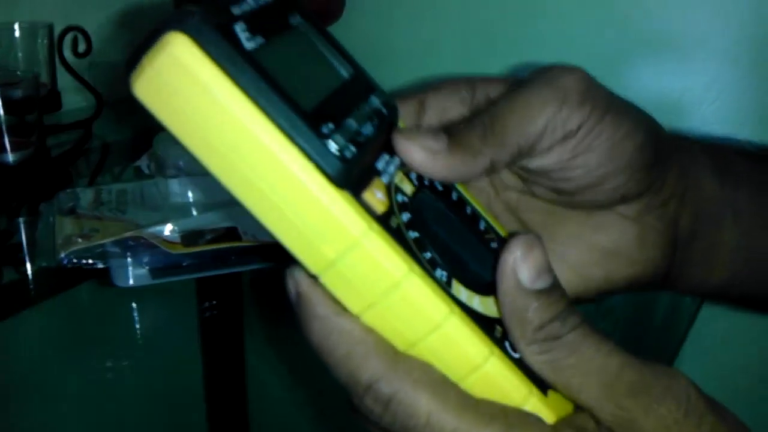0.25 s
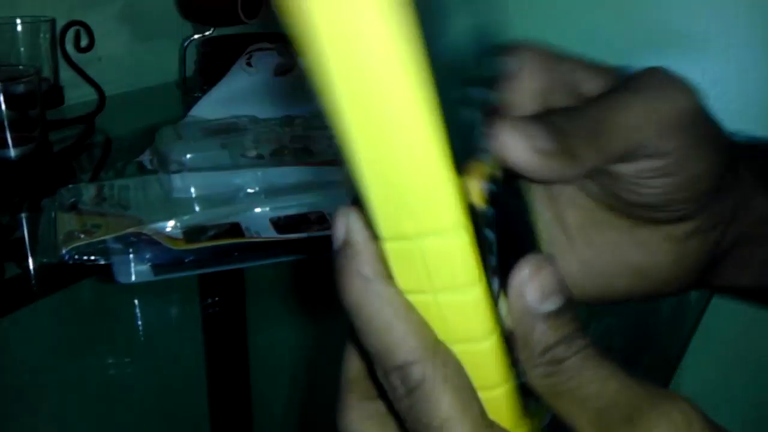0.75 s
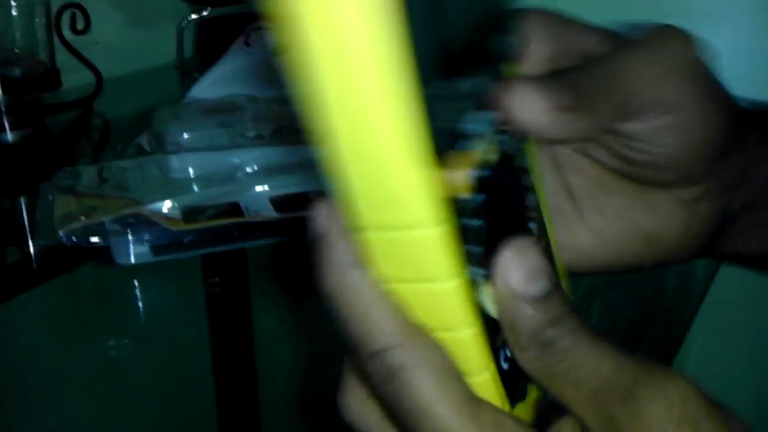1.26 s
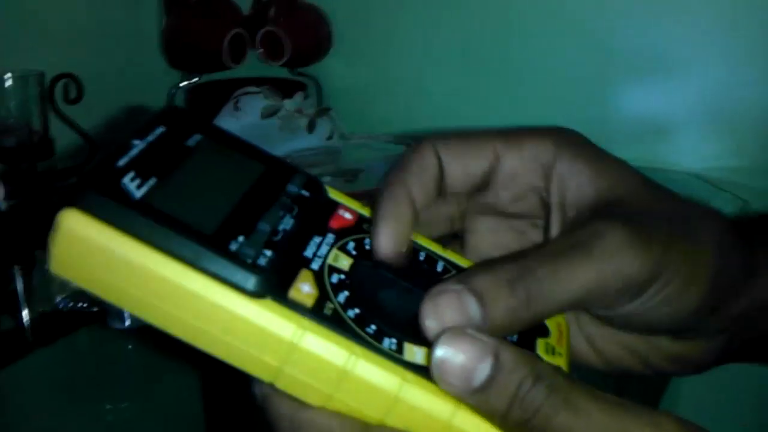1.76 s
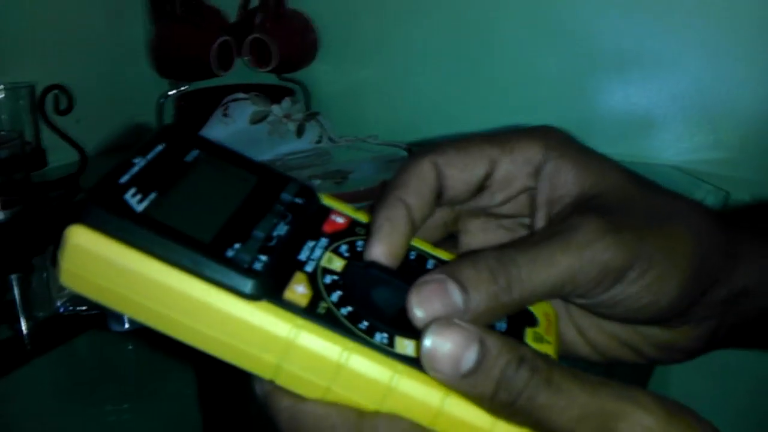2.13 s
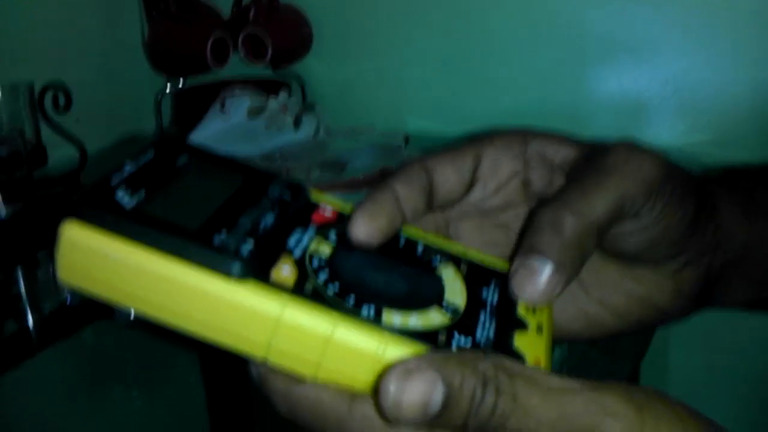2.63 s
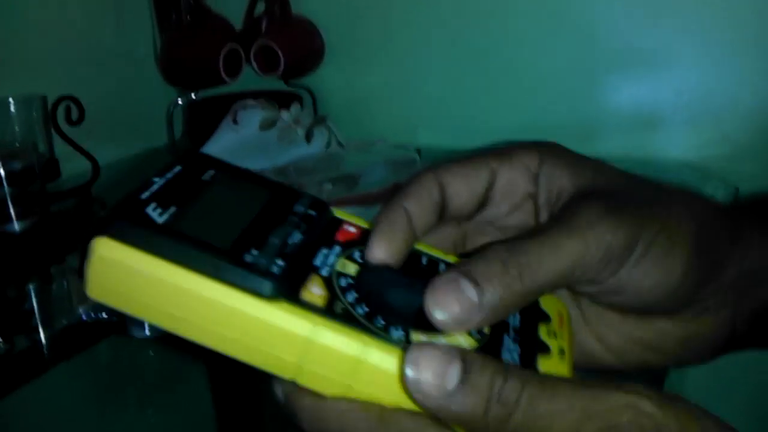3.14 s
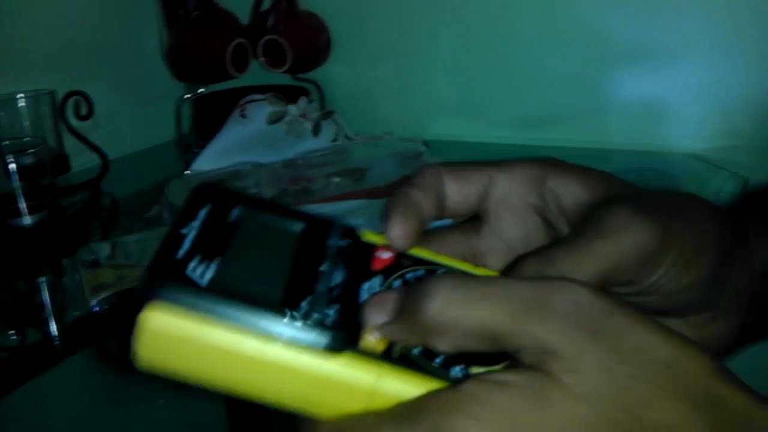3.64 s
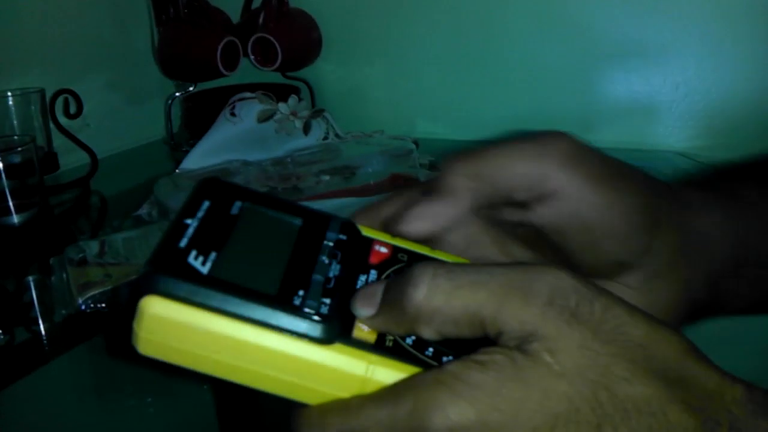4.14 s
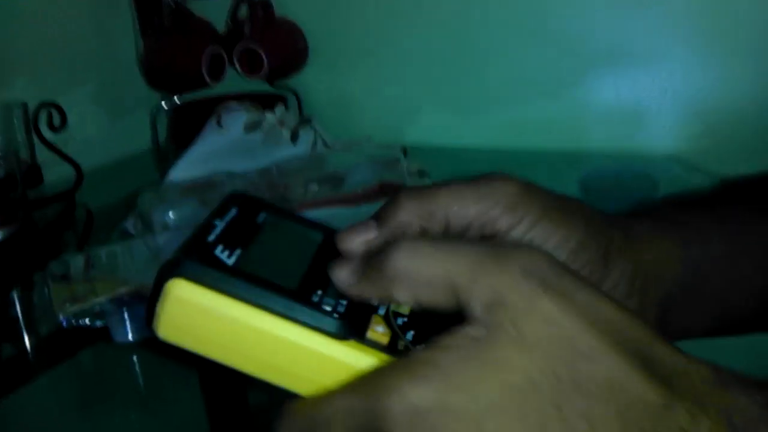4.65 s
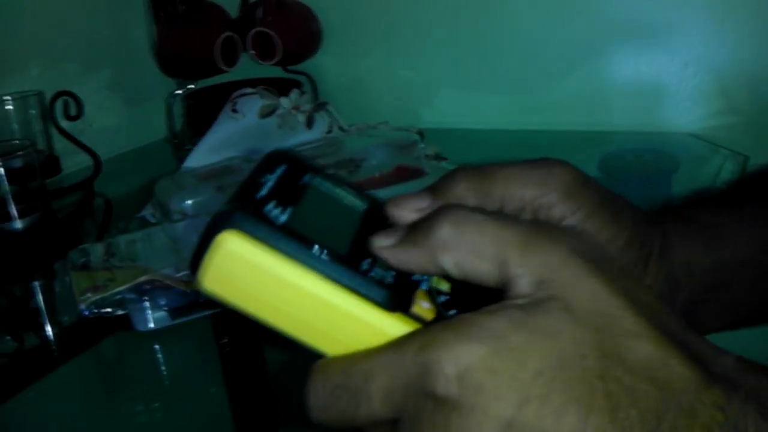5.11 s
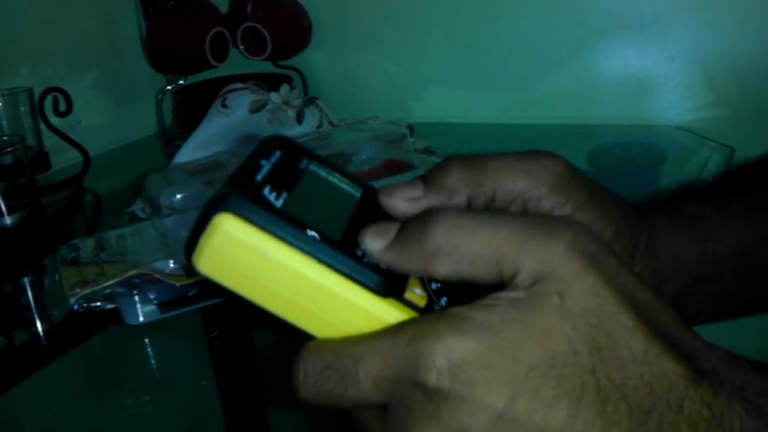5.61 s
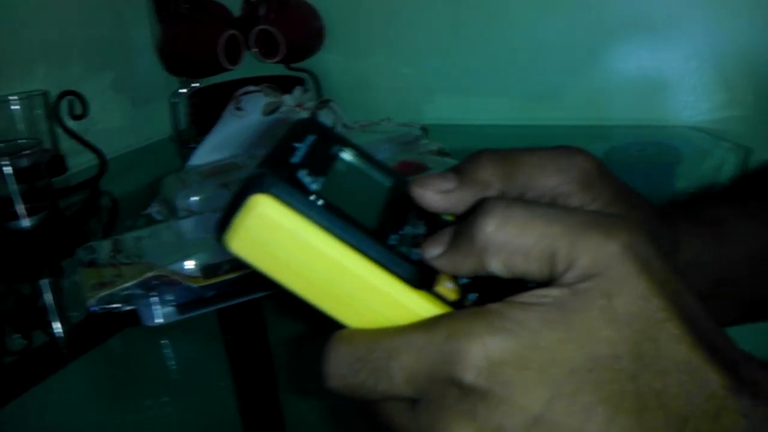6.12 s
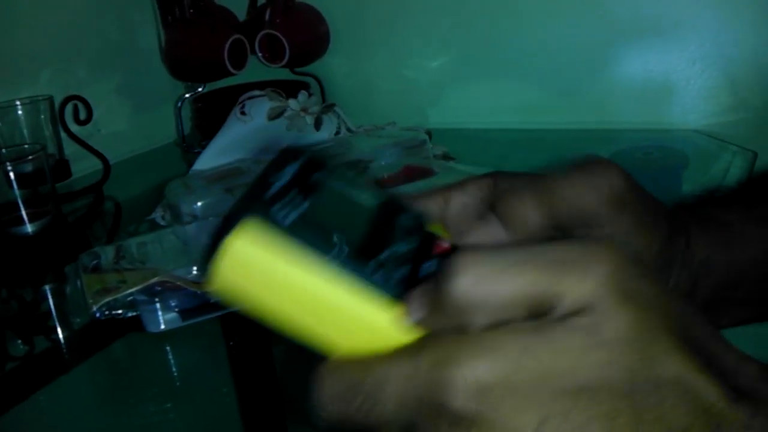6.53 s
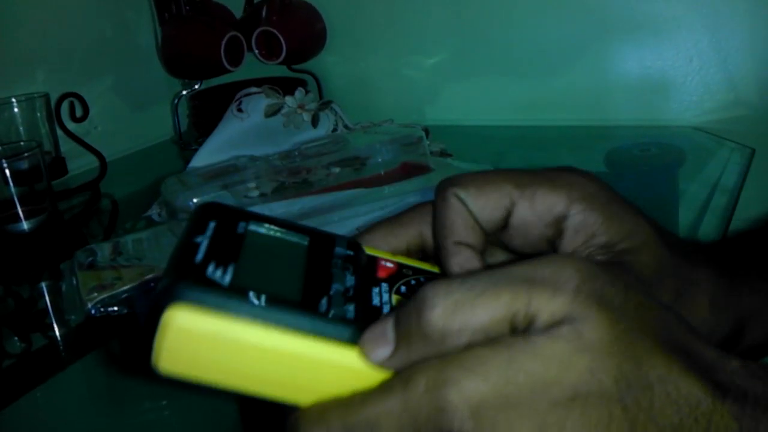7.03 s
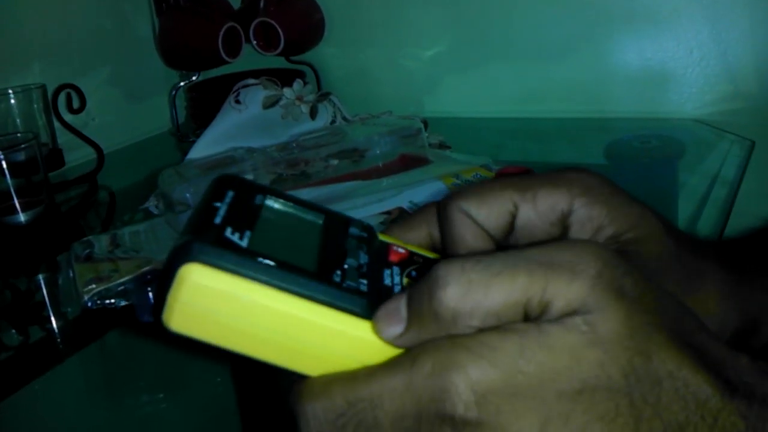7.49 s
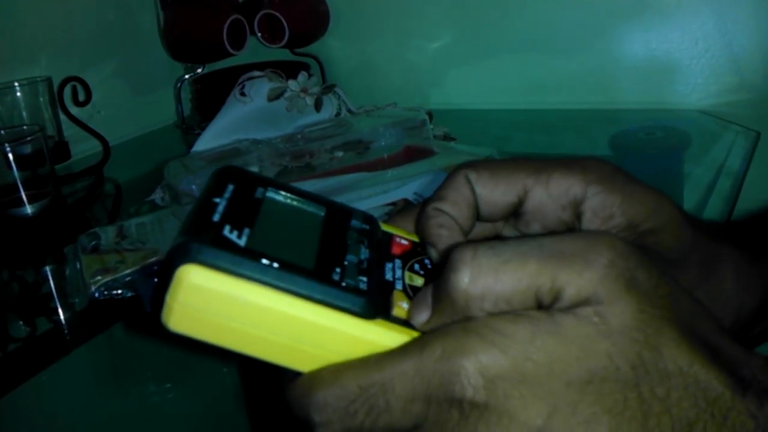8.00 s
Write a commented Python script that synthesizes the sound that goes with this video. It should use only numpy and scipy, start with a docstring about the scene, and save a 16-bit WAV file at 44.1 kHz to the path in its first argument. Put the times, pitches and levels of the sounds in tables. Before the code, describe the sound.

Close plastic handling: soft rubbing, grip creaks and small clicks, then one hard dial snap midway and a harsher double snap near the end.

```python
"""In a quiet room, a handheld meter is turned over and worked close to a small stereo microphone.
Hands rustle on it (coloured, fluttering noise), and the grip creaks (noise ringing the case).
Its dial snaps twice, hard enough to overload the microphone; buttons and case tick lightly
(fading tones and noise bursts). Fingers slide over the plastic with a hiss.
The room adds a short echo (fading noise and one wall) and a faint noise of still air."""
import sys
import numpy as np
from scipy import signal
from scipy.fft import rfft, irfft, next_fast_len
from scipy.io import wavfile
from scipy.ndimage import uniform_filter1d

SR = 44100
rng = np.random.default_rng(int(sys.argv[2]) if len(sys.argv) > 2 else 0)


def to_wav(sig):
    """Store sig (one row per channel, or 1-D mono) as 16-bit WAV at the path in sys.argv[1].

    Samples outside -1..1 are clipped; the rate is SR.
    """
    pcm = np.clip(np.atleast_2d(sig), -1, 1) * 32767
    pcm = np.round(pcm).astype(np.int16)
    wavfile.write(sys.argv[1], SR, pcm.T)  # frames by channels


N = 364131
TIME = np.arange(N) / SR


def undb(db):
    """Turn decibels into a gain."""
    return 10 ** (np.asarray(db) / 20)


def unit(x):
    """Scale to an rms of 1."""
    return x / np.sqrt(np.mean(x ** 2))


def at(points, hz):
    """Read a curve of (Hz, value) points on a log-frequency axis."""
    point_hz, value = np.transpose(points)
    return np.interp(np.log(np.maximum(hz, 1)), np.log(point_hz), value)


def freqs(size):
    """Frequencies in Hz of the bins of a spectrum."""
    return np.arange(size // 2 + 1) * SR / size


def colour(x, points):
    """Filter a sound by a curve of (Hz, dB) points."""
    size = next_fast_len(x.shape[-1], True)
    spectrum = rfft(x, size) * undb(at(points, freqs(size)))
    return irfft(spectrum, size)[..., :x.shape[-1]]


def decay(t, t60):
    """Die away by 60 dB in t60 seconds."""
    return np.exp(-np.log(1000) * t / t60)


def port_noise(count):
    """White noise at the two microphone ports: most alike in the low mids, unrelated in the treble."""
    # likeness of the two ports: pitch_hz, correlation (0-1)
    likeness = [(30, .5), (120, .7), (280, .95), (450, .9), (750, .72), (1400, .5), (2500, .2), (5000, 0),
                (14000, 0)]
    size = next_fast_len(count, True)
    mid, side = rfft(rng.standard_normal((2, size)))
    alike = at(likeness, freqs(size))
    mid = mid * np.sqrt(1 + alike)
    side = side * np.sqrt(1 - alike)
    return irfft(np.array([mid + side, mid - side]), size)[:, :count] / np.sqrt(2)


def flutter(rate_hz, depth_db):
    """A gain that wanders at random, with rate_hz new random targets a second."""
    knots = rng.standard_normal(8192)
    wander = np.interp(TIME * rate_hz, np.arange(len(knots)), knots)
    return unit(undb(depth_db * wander))


def add(track, start_s, sound):
    """Mix a sound into a track at a given time."""
    i = int(start_s * SR)
    part = sound[..., :N - i]
    track[..., i:i + part.shape[-1]] += part


def stroke(fade_s, rise_s):
    """Envelope of a short slide: it gathers speed quickly and dies away."""
    t = np.arange(SR // 2) / SR
    return (1 - np.exp(-t / rise_s)) * np.exp(-t / fade_s)


def even(x, width_hz):
    """Level out the chance humps of a noise burst, so that only its fine grain stays random."""
    size = x.shape[-1]
    spectrum = rfft(x)
    mean_power = np.mean(np.abs(spectrum) ** 2, axis=0)
    power = uniform_filter1d(mean_power, max(int(width_hz * size / SR), 1))
    return unit(irfft(spectrum / np.sqrt(power + 1e-18), size))


def burst(t, t60, points):
    """Many close modes struck at once and dying together, made as a fading noise."""
    fade = decay(t, t60)
    noise = even(port_noise(len(t)) * fade, 300)
    short = colour(noise, points) * (t < .08)
    return unit(short) * np.sqrt(np.mean(fade ** 2))


def still_air():
    """The still air of the room: a steady, faint noise."""
    # colour of the air noise: pitch_hz, level_db
    air_colour = [(15, -52), (25, -17.5), (82, -12), (278, -0.5), (472, -10), (554, -6), (703, -19),
                  (802, -6), (1440, -24), (2250, -17), (3830, -23), (4480, -22), (6160, -35.5), (9410, -26),
                  (14000, -20.5)]
    return undb(-64) * unit(colour(port_noise(N), air_colour))


def hands():
    """Shifting hands bump the holster softly and rub on it: each shift swells, then settles to a quiet hold."""
    # shifts of the hands: fastest_s, fade_s, and relative levels of the dull bumping bump_db
    # and the skin rubbing rub_db
    shifts = [(0.01, 0.042, -59, -62), (0.172, 0.064, -51, -56), (0.39, 0.064, -62, -66),
              (0.74, 0.13, -59.5, -65), (1.02, .07, -65, -67), (1.24, 0.045, -59, -64),
              (1.34, 0.19, -53, -59.5), (1.73, .24, -50.5, -48), (2.2, 0.27, -57, -60.5),
              (2.4, 0.094, -49, -62), (2.76, 0.067, -58.5, -63.5), (2.9, 0.17, -59.5, -65),
              (3.18, 0.13, -56, -69), (3.4, 0.16, -52.5, -59), (3.55, 0.13, -53.5, -54),
              (3.689, 0.048, -48.5, -52), (3.891, 0.063, -57.5, -68.5), (4.231, 0.065, -54.5, -66),
              (4.59, 0.16, -50, -57), (4.97, 0.16, -55, -69), (5.32, .14, -49, -52.5),
              (5.718, 0.087, -53.5, -56.5), (6.11, 0.054, -60, -71.5), (6.29, 0.069, -57.5, -66.5),
              (6.539, .08, -51.5, -55), (6.76, 0.22, -50.5, -54.5), (6.91, 0.099, -49.5, -57),
              (7.231, 0.13, -54, -57.5), (7.458, 0.2, -51.5, -49.5), (7.668, 0.029, -47, -51.5),
              (8.08, 0.27, -56.5, -55)]
    # colours of bumping and rubbing: pitch_hz, level_db
    bump_colour = [(30, -25), (100, -8.5), (180, -2.5), (290, 2.5), (450, -6.5), (700, -8.5), (1200, -14.5),
                   (3000, -30.5)]
    rub_colour = [(200, -2.5), (700, -5.5), (1300, 6.5), (1580, -0.5), (1690, 4.5), (1820, 1), (2300, 2),
                  (3500, -5), (5000, -6.5), (7000, -13.5), (10000, -11), (14000, -19)]
    swell_share = .5  # the swell's time scale, as a share of the fade time
    t = TIME[::64]  # slow movement needs few points
    fastest_s, fade_s, bump_db, rub_db = np.transpose(shifts)[..., None]
    age = (t - fastest_s) / fade_s
    speed = np.exp(-np.where(age < 0, (age / swell_share) ** 2, age))

    def strength(shift_db, hold_db):
        """Add the power of all shifts to the little stir of hands that only hold the meter."""
        power = undb(hold_db) ** 2 + np.sum((undb(shift_db) * speed) ** 2, axis=0)
        return np.interp(TIME, t, np.sqrt(power))

    bumps = unit(colour(port_noise(N), bump_colour)) * flutter(45, 3)
    rubs = unit(colour(port_noise(N), rub_colour)) * flutter(250, 3)
    bumping = strength(bump_db, -64.5) * bumps
    rubbing = strength(rub_db, -70.5) * rubs
    return undb(-3) * (bumping + rubbing)


def creaks():
    """Skin sticks and slips on the case; the dense slips, made as noise, ring its resonances."""
    # creaks of the grip: start_s, relative level_db, brightness_db
    creak_times = [(0.151, -51, -11), (0.384, -49.5, -12), (0.783, -48, 6), (1.1034, -48, 4),
                   (1.501, -45, 10), (1.641, -43.5, 7.5), (1.687, -45, -8), (2.323, -38.5, 6),
                   (2.4, -47.5, -12), (2.4924, -42.5, 2), (3.1976, -40, -10), (3.3893, -37.5, 6),
                   (3.4526, -34.5, 5.5), (3.5405, -32, 5), (3.615, -37, 3), (3.6819, -38.5, -2),
                   (4.575, -45.5, 3), (4.6535, -37.5, 4), (4.9696, -51, 3.5), (5.0317, -46.5, 7),
                   (5.077, -40.5, 3), (5.1683, -43.5, 5), (5.228, -44.5, -0.5), (5.306, -35, 2),
                   (5.4208, -39, 8), (5.7186, -37.5, 2), (5.8569, -54.5, -3), (5.9844, -47.5, 2.5),
                   (6.4756, -43, -0.5), (6.535, -43.5, 6), (6.6803, -35.5, 4.5), (6.756, -36, 6.5),
                   (6.7934, -42, -2), (6.873, -34, 7.5), (6.9592, -37.5, 4.5), (7.1108, -38.5, 3),
                   (7.2224, -39, 0.5), (7.53, -33.5, 6.5), (7.6344, -36, -11), (7.675, -36.5, 6),
                   (7.766, -45.5, 4), (7.9453, -49, -9)]
    # resonances of the gripped case: pitch_hz, width_hz, level_db
    grip = [(442, 830, -8), (760, 180, -12), (1150, 170, 1), (1350, 53, -4), (1512.5, 22, 0),
            (2064, 130, -4.5), (2260, 41, 4), (2730, 260, -3.5), (3190, 36, -9), (4020, 150, -11.5),
            (4540, 390, -14.5)]
    rise_s, fade_s = 0.0037, 0.022  # every creak grows and dies away alike
    edge_hz = 2800  # from here up, brightness also sets the level
    force, edge = np.zeros(N), np.zeros(N)
    envelope = stroke(fade_s, rise_s)
    for start_s, level_db, bright_db in creak_times:
        add(force, start_s - rise_s, undb(level_db) * envelope)
        add(edge, start_s - rise_s, undb(level_db + bright_db) * envelope)
    slips = port_noise(N) * flutter(600, 3)
    size = next_fast_len(N, True)
    f = np.maximum(freqs(size), 1)
    low, high = 0, 0
    for k, (hz, width_hz, level_db) in enumerate(grip):
        # neighbouring resonances swing in opposite directions
        mode = (-1) ** k * undb(level_db) / (1 + 1j * (f / hz - hz / f) * hz / width_hz)
        if hz < edge_hz:
            low = low + mode
        else:
            high = high + mode
    spread = np.sqrt(np.mean(np.abs(low + high) ** 2))
    spectrum = rfft(slips * force, size) * low + rfft(slips * edge, size) * high
    return undb(-6) / spread * irfft(spectrum, size)[:, :N]


def clicks():
    """Each blow rings the shell's modes and the small part that moved, with a brief crack and a clatter."""
    # snaps of the dial and ticks of buttons and case: start_s, relative level_db, thump_db of the
    # hollow case, brightness_db, place on the shell (0-1), part_hz and part_db of the part that moves
    blows = [(0.1657, -25, 5, -27, 0.7, 1410, -8.5), (0.559, -46, -14, 2, 0.9, 2110, 2.5),
             (0.5700, -27, -19, 0.5, 0.1, 4440, -2.5), (0.5735, -47, 11, 10, 0.1, 395, 28),
             (1.3310, -28.5, 7, -27, 0.8, 1220, -15.5), (1.64, -49, -2, -14, .8, 1190, 8.5),
             (2.323, -44, 13, -24, 0.7, 1155, 5), (3.199, -33, 15, -15, .8, 1241, -16),
             (3.231, -22, 12, 0, 0.7, 10800, -2), (3.2354, -2.5, 2, 4, 0, 2928, -7),
             (3.3640, -27.5, -17, -4, 0.8, 2970, -5), (3.5288, -29, -18.5, -21, 0.4, 1530, -6.5),
             (4.745, -56, -13, 9, 0.24, 7370, 3.5), (5.2580, -31, -15, -20.5, 0.94, 1240, -6.5),
             (5.305, -35, -23, -26, .7, 268, 4.5), (5.4000, -40.5, 2, 4.5, 0, 3500, -1),
             (5.424, -44, -12, -12, .7, 2280, 2), (5.6370, -38, -5, -10, 0.87, 1257, -11),
             (6.537, -34.5, 4, -15, 0.26, 1374, 1.5), (6.7458, -27.5, -17.5, -20, 0.74, 1180, -4.5),
             (6.776, -41, 24, -20, 0.5, 414, -5), (6.86, -31, -13, -16, 0, 1153, -4),
             (6.9875, -28, -4.5, -13.5, 0.67, 2510, -8), (7.281, -21, -18, 2, 0.66, 2460, -2.5),
             (7.2858, 0, 1.5, 1.5, 1, 2580, -12.5), (7.3010, -3.5, 6.5, 4, 0.9, 1840, -10),
             (8.025, -59.5, -16.5, 3.5, 0.7, 9200, 9.5), (8.1443, -39, -13.5, -11, 0.97, 2550, 3.5)]
    # modes of the plastic shell: pitch_hz, t60_s, first_db (struck at place 0), second_db (at place 1)
    shell = [(342.1, 0.067, -16.5, -22.5), (432, .05, -14.5, -17.5), (740, 0.05, -13.5, -9),
             (942, 0.083, -29.5, -22.5), (1146, 0.087, -15.5, -15.5), (1345, 0.081, -28.5, -12),
             (1607, 0.1, -28, -12.5), (1720, 0.012, -22.5, -21.5), (1810, .045, -13, -20.5),
             (2207, 0.04, -15.5, -16.5), (2527, 0.093, -22.5, -13.5), (2670, 0.041, -13.5, -20),
             (3245, 0.07, -12.5, -24), (4230, 0.073, -20.5, -17), (4590, .03, -12.5, -20),
             (5180, 0.072, -13, -31), (8080, 0.092, -29, -15.5), (8840, .055, -30.5, -19.5),
             (9786, .05, -27.5, -20)]
    # colour of the sharp edge of a click: pitch_hz, level_db
    crack_colour = [(40, -40.5), (1000, -20.5), (3000, -2.5), (5000, -1.5), (7500, -1.5), (9000, 0.5),
                    (11000, -1), (14000, -4.5)]
    # colour of the crowd of close modes: pitch_hz, level_db
    clatter_colour = [(40, -17), (200, -7), (400, 0.5), (800, 1), (1200, 1), (1900, 2), (3000, 0),
                      (5000, -2.5), (7000, -16), (14000, -20)]
    hollow_hz = 540
    spread_hz = 3600  # from here up, the two ports are a quarter cycle apart
    contact_s = 0.00043  # how quickly a blow builds up
    out = np.zeros((2, N))
    t = np.arange(SR // 10) / SR
    hz, t60, first_db, second_db = np.transpose(shell)
    hollow = 1 / (1 + (hz / hollow_hz) ** 8)
    sign = (-1) ** np.arange(len(hz))
    for start_s, level_db, thump_db, bright_db, place, part_hz, part_db in blows:
        dull_db = min(bright_db, 0) * np.minimum(hz / 8000, 1)  # a soft contact misses the high modes
        place_db = (1 - place) * first_db + place * second_db
        gain = sign * undb(-4 + place_db + thump_db * hollow + dull_db)
        # short waves reach the two ports up to a quarter cycle apart
        shift = rng.choice([-1, 1], len(hz)) * np.minimum(hz / spread_hz, 1)
        lag = np.outer([1, -1], shift) * np.pi / 4
        waves = np.sin(2 * np.pi * hz[:, None] * t + lag[..., None]) * decay(t, t60[:, None])
        ring = np.sum(gain[:, None] * waves, axis=1)
        part = undb(part_db) * np.sin(2 * np.pi * part_hz * t) * decay(t, .022)
        crack = undb(-4.5 + bright_db) * burst(t, .018, crack_colour)
        clatter = undb(-5.5 + bright_db / 2) * burst(t, 0.03, clatter_colour)
        attack = 1 - np.exp(-t / contact_s)
        add(out, start_s, undb(level_db) * attack * (ring + part + crack + clatter))
    return out


def slides():
    """A fingertip brushes over the plastic: a grainy, bright hiss that follows its speed."""
    # slides of the fingers: start_s, relative level_db, fade_s
    strokes = [(1.041, -66, 0.045), (1.335, -71, 0.11), (1.721, -39.5, 0.024), (7.61, -64.5, 0.041)]
    # colour of the hiss: pitch_hz, level_db
    slide_colour = [(200, -14), (1000, -10), (2500, -7), (3500, -11.5), (4500, 2), (5500, -7), (7000, -14),
                    (9000, -3.5), (11000, -14), (14000, -19)]
    speed = np.zeros(N)
    for start_s, level_db, fade_s in strokes:
        add(speed, start_s, undb(level_db) * stroke(fade_s, 0.0036))
    hiss = unit(colour(port_noise(N), slide_colour))
    return 2 * speed * hiss * flutter(500, 4.5)


def room(x):
    """Echo of a small room: near surfaces answer first, one wall stands out, the top treble dies first."""
    # how long the echo lasts: pitch_hz, t60_s
    room_t60 = [(200, 0.18), (600, 0.28), (2000, 0.26), (4500, 0.29), (9000, 0.23), (14000, 0.11)]
    # colour of the echo: pitch_hz, level_db
    room_colour = [(100, 0.5), (300, 1), (470, 3.5), (640, 4), (900, -1), (1400, -2), (2000, -2.5),
                   (4500, -0.5), (9000, -1.5), (14000, 2.5)]
    first_echo_s, build_s, early_s = 0.0038, .003, 0.018
    wall_s, wall_db, wall_hz = .018, -16, 1200  # delay, level, edge of the wall's dullness
    size = SR // 2
    t, f = np.arange(size) / SR, freqs(size)
    noise = rfft(port_noise(size))
    centres = [hz for hz, _ in room_t60]
    tail = 0
    # each band of the noise fades at its own pace
    for share, (_, t60) in zip(np.eye(len(centres)), room_t60):
        band = irfft(noise * at(list(zip(centres, share)), f), size)
        tail = tail + band * decay(t, t60)
    arrival = 1 - np.exp(-np.maximum(t - first_echo_s, 0) / build_s)
    arrival = arrival * (1 + np.exp(-t / early_s))  # near surfaces make the start stronger
    tail = unit(colour(even(tail * arrival, 40), room_colour) * (t < .4))
    diffuse = signal.fftconvolve(x, tail / np.sqrt(size), axes=1)[:, :N]
    wall = np.zeros((2, N))
    dull = signal.butter(1, wall_hz, fs=SR, output="sos")
    add(wall, wall_s, signal.sosfilt(dull, x))
    return undb(-7) * diffuse + undb(wall_db) * wall


def scene():
    """The meter and the hands, their echo, and the still air of the room."""
    air = still_air()
    friction = hands() + creaks() + slides()
    # so small a case radiates little bass
    bass_cut = signal.butter(2, 165, "high", fs=SR, output="sos")
    hits = signal.sosfilt(bass_cut, clicks())
    echo = room(hits + undb(3) * friction)  # friction feeds the echo 3 dB more strongly
    return hits + friction + echo + air


def record(dry):
    """The two ports differ a little and share a dip in the treble; the hardest snaps overload; the top is cut."""
    # colour shared by both ports: pitch_hz, level_db
    mic_colour = [(5300, 2), (5800, -3.5), (6400, -4.5), (7100, -1), (8000, 1.5)]
    # balance of the ports: pitch_hz, left_minus_right_db
    port_balance = [(300, -1), (600, 0.1), (1300, 0.5), (2700, -2), (4800, 2.5), (8000, -2.5), (14000, 0.5)]
    size = next_fast_len(N, True)
    f = freqs(size)
    balance_db = np.outer([.5, -.5], at(port_balance, f))
    response = undb(at(mic_colour, f) + balance_db)
    heard = irfft(rfft(dry, size) * response, size)[:, :N]
    overloaded = heard / (1 + (heard / .92) ** 6) ** (1 / 6)  # peaks are rounded off below .92
    top_cut = signal.ellip(10, .2, 70, 14100, fs=SR, output="sos")  # steep cut at 14100 Hz
    return signal.sosfilt(top_cut, overloaded)


dry = scene()
out = record(dry)
to_wav(out)
```